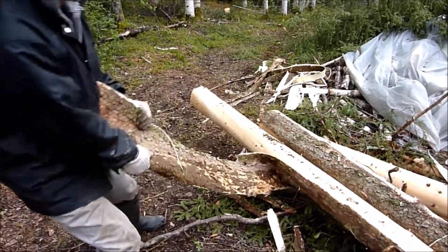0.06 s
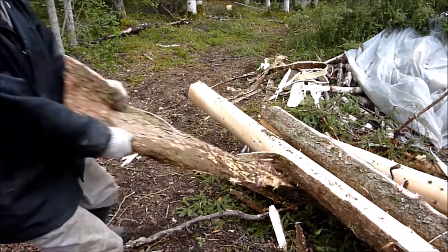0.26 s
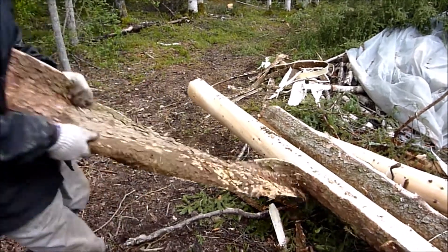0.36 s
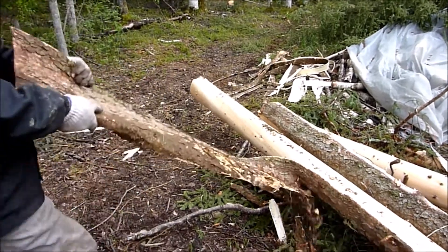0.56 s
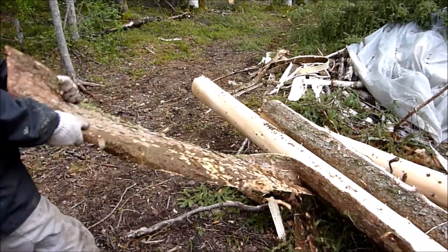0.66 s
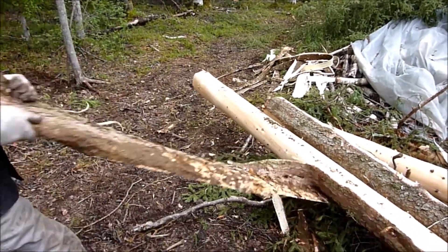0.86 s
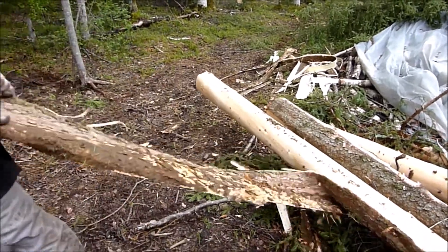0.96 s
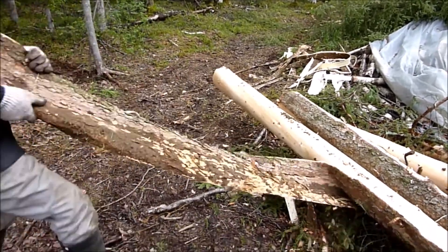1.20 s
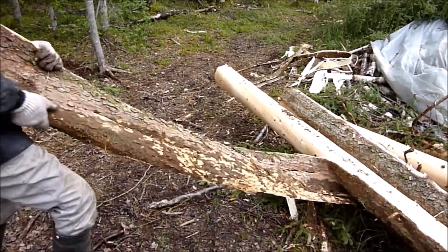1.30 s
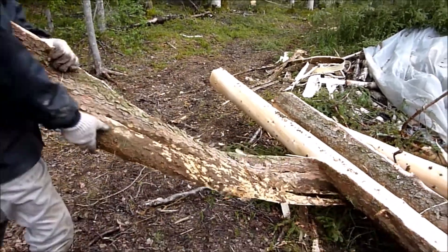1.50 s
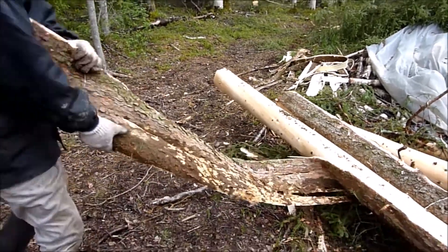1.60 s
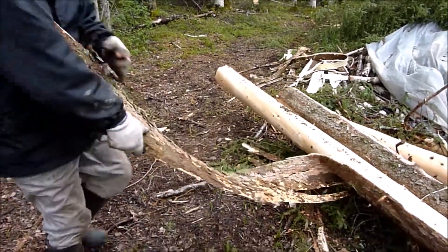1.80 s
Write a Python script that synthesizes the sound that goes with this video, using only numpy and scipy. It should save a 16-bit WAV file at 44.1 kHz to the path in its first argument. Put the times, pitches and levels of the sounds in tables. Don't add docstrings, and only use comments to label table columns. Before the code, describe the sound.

Bark tears off a log in two short tugs, each a dense dry crackle with sharp fibre snaps and hollow knocks, then light rustling and twig ticks; close stereo microphone in quiet woods.

```python
import sys
import numpy as np
from scipy import signal
from scipy.io import wavfile

SR = 44100
rng = np.random.default_rng(int(sys.argv[2]) if len(sys.argv) > 2 else 0)


def amplitude_ratio(level_db):
    exponent = np.asarray(level_db, float) / 20
    return 10 ** exponent


def output_pcm(signal):
    pcm = np.clip(np.atleast_2d(signal).T, -1, 1) * 32767
    wavfile.write(sys.argv[1], SR, np.round(pcm).astype(np.int16))


N = 81585


def rms_one(x):
    return x / np.sqrt(np.mean(x ** 2) + 1e-20)


def in_time(rows, outside=-120):
    s, *columns = np.transpose(rows)
    return [np.interp(np.arange(N) / SR, s, c, outside, outside) for c in columns]


def at_hz(points, hz):
    table_hz, level_db = np.transpose(points)
    return np.interp(np.log(hz), np.log(table_hz), level_db)


def drift(rate_hz):
    r = np.exp(-2 * np.pi * rate_hz / SR)
    wander = signal.lfilter([1], [1, -2 * r, r * r], rng.standard_normal(N + SR))
    return rms_one(wander[SR:])


def band_noise(order, edges_hz, noise):
    return signal.sosfilt(signal.butter(order, edges_hz, "band", fs=SR, output="sos"), noise)


def ring(push, hz, t60):
    r, w = amplitude_ratio(-60 / (t60 * SR)), 2 * np.pi * hz / SR
    return signal.lfilter([0, np.sin(w)], [1, -2 * r * np.cos(w), r * r], push + 1e-18)


def clicks(per_s, spread_db):
    size = amplitude_ratio(spread_db * np.minimum(rng.exponential(1, N), 5)) * rng.choice([-1, 1], N)
    return size * (rng.random(N) < per_s / SR)


def grains(per_s, spread_db, pitches_hz, gains_db, cycles):
    train = clicks(per_s, spread_db)
    dealt = rng.integers(0, len(pitches_hz), N)
    total = 0
    for k, (hz, gain_db) in enumerate(zip(pitches_hz, gains_db)):
        total = total + amplitude_ratio(gain_db) * rms_one(ring(train * (dealt == k), hz, cycles / hz))
    return rms_one(total)


FIBRES_PER_S, FIBRE_SPREAD_DB, FIBRE_CYCLES, CLUMP_DB = 16000, 2.6, 14.0, 1.1


def crackle(spectrum, clumps_per_s):
    hz = np.geomspace(1200, 15000, num=24)
    gains_db = at_hz(spectrum, hz) + 10 * np.log10(hz)
    clumps = amplitude_ratio(CLUMP_DB * drift(clumps_per_s))
    return clumps * grains(FIBRES_PER_S, FIBRE_SPREAD_DB, hz, gains_db, FIBRE_CYCLES)


SNAP_S, SNAP_RISE_S, SNAP_WIDTH_OCTAVES, SNAP_BROAD_DB, SNAP_LEAD = .0011, .0002, .75, -17, 3.5


def snaps(rows):
    out, t = np.zeros(N + SR), np.arange(600) / SR
    for (s, db, hz), noise in zip(rows, rng.standard_normal((len(rows), len(t)))):
        burst = (noise - SNAP_LEAD * (t == 0)) * np.exp(-t / SNAP_S)
        edges = hz * 2 ** np.array([-SNAP_WIDTH_OCTAVES, SNAP_WIDTH_OCTAVES])
        peak = band_noise(2, np.clip(edges, 100, .45 * SR), burst)
        broad = np.diff(burst, prepend=0) / np.abs(burst).max()
        snap = peak / np.abs(peak).max() + amplitude_ratio(SNAP_BROAD_DB) * broad
        start = int((s - SNAP_RISE_S) * SR)
        out[start:start + len(t)] += amplitude_ratio(db) * snap
    return out[:N]


LEAN_HZ, WIDE_DB, WIDE_HZ, SCATTER_S, PATHS_PER_S = 1200, -1.5, 8000, .0015, 60


def stereo(x, left_db):
    t = np.arange(600) / SR
    scatter = rng.standard_normal((8, len(t))) * np.exp(-t / SCATTER_S)
    scatter = scatter / np.linalg.norm(scatter, axis=1, keepdims=True)
    treble = signal.lfilter(*signal.butter(1, WIDE_HZ, "high", fs=SR), x)
    away = (np.arange(N) / SR * PATHS_PER_S - np.arange(8)[:, None]) % 8 - 1
    share = np.cos(np.pi / 2 * np.clip(away, -1, 1))
    side = amplitude_ratio(WIDE_DB) * signal.fftconvolve(treble * share, scatter, axes=1)[:, :N].sum(0)
    lean = signal.lfilter(*signal.butter(1, LEAN_HZ, "high", fs=SR), x)
    left = x + side + (amplitude_ratio(left_db) - 1) * lean
    right = x - side + (amplitude_ratio(-left_db) - 1) * lean
    return np.array([left, right])


# pitch_hz, level_db (per Hz)
FOREST = [(15, -14), (28, 9.5), (45, -1.5), (754, -0.5), (2220, -12), (6740, -15.5), (7920, -22.5),
          (12500, -17.5), (14800, -24), (16000, -36)]
# pitch_hz, likeness (0 to 1)
LIKENESS = [(60, 0.92), (240, 0.81), (950, 0.83), (3770, 0.033), (15000, 0.011)]
FOREST_DB = -55


def forest():
    out, together, edges = 0, drift(2.5), 20 * 2 ** np.arange(0, 10, .5)
    white = rng.standard_normal((2, 2, N))
    for k, (low, high) in enumerate(zip(edges, edges[1:])):
        mid, side = band_noise(2, [low, high], white[k % 2])
        hz = np.sqrt(low * high)
        alike = np.clip(at_hz(LIKENESS, hz), -1, 1)
        gain = amplitude_ratio(at_hz(FOREST, hz) + .6 * together + 1.2 * drift(12))
        out = out + gain * (np.sqrt(1 + alike) * mid + np.sqrt(1 - alike) * side * [[1], [-1]])
    return amplitude_ratio(FOREST_DB) * rms_one(out)


# start_s, rustle level_db, weight level_db
MOVE = [(0, -96, 2), (.1, -66, -6), (.135, -52.5, 12.5), (.165, -60, 3), (.55, -64, -4.5), (1.1, -62, 2),
        (1.18, -61, 0), (1.23, -63, 2.5), (1.29, -55.5, -0.5), (1.35, -62, 1.5), (1.42, -55.5, 4.5),
        (1.5, -62, 3.5), (1.56, -66, 0.5), (1.61, -63.5, 3), (1.85, -66.5, 1)]
# pitch_hz, level_db (per Hz)
RUSTLE = [(530, -31), (900, -1), (956, -55), (1310, -2), (1790, -4), (10600, -8), (16000, -13)]
# start_s, peak level_db, pitch_hz
TICKS = [(.0342, -60, 3900), (.0881, -49, 4500), (.5708, -43.5, 2600), (.6479, -43.5, 5000),
         (.6653, -53, 4300), (.6798, -48, 3800), (.689, -45, 7500), (.6929, -37.5, 5000),
         (.7028, -49, 9400), (.7157, -44, 5800), (.7294, -46, 11000), (.7381, -35.5, 2000),
         (1.1737, -43, 4600), (1.1912, -39, 12000), (1.2199, -45, 7000), (1.2379, -52, 2600),
         (1.2449, -53, 9900), (1.2654, -49, 2300), (1.2802, -38, 2280), (1.2886, -39, 6500),
         (1.3345, -53, 12000), (1.39, -48, 9800), (1.397, -44, 10000), (1.449, -42, 1600),
         (1.458, -48, 2500), (1.4665, -50, 7500), (1.4785, -63, 2260), (1.5243, -44, 2000),
         (1.6052, -38, 4840), (1.6051, -57, 10300), (1.7623, -43, 1920), (1.7622, -48, 4600),
         (1.8283, -50, 14100)]
CRUNCH_DB, CRUNCH_PER_S, CRUNCH_LOW_HZ, CRUNCH_HIGH_HZ = -61, 1200, 309, 1620


def movement():
    move_db, weight_db = in_time(MOVE)
    hz = np.geomspace(CRUNCH_LOW_HZ, CRUNCH_HIGH_HZ, num=12)
    hump_db = -2.5 * np.log2(hz / 700) ** 2
    crunch = amplitude_ratio(CRUNCH_DB + weight_db) * grains(CRUNCH_PER_S, 1.8, hz, hump_db, 9.0)
    rustle = amplitude_ratio(move_db) * crackle(RUSTLE, 60)
    return rustle + snaps(TICKS) + crunch


# start_s, tearing level_db, drone of the wood over it level_db
TUG_1 = [
    (.215, -68, 8),
    (.2405, -55, 7),
    (.246, -44.5, 4.5),
    (.29, -37.5, 6.5),
    (.35, -35, 2),
    (.39, -38, -0.3),
    (.413, -39.5, 9),
    (.44, -50.5, 0),
    (.49, -70, 10),
]
TUG_2 = [
    (.68, -62.5, 0.92),
    (.745, -54, 1),
    (.775, -44, 3.1),
    (.85, -40.5, 0.43),
    (.9, -39, 1.3),
    (.93, -38.5, 3.8),
    (.985, -42, 3.7),
    (1.012, -53, 1.4),
    (1.035, -70, 8.9),
]


def tug_force():
    (first, first_low), (second, second_low) = in_time(TUG_1), in_time(TUG_2)
    tear_db = np.maximum(first, second)
    return tear_db, tear_db + np.maximum(first_low, second_low)


SHUDDER_DB, SHUDDER_HZ = -16, 121


def shudder(drone_db):
    low = band_noise(3, [SHUDDER_HZ / 2.35, SHUDDER_HZ * 2.9], rng.standard_normal(N))
    return amplitude_ratio(drone_db + SHUDDER_DB) * rms_one(low)


# start_s, peak level_db,
# contact pitch_hz
KNOCKS = [(.0875, -39, 656), (.129, -44, 704), (.153, -36, 756), (.2255, -50, 654), (0.2426, -6, 890),
          (.2438, -13, 1730), (.2475, -23, 1100), (0.2452, -25.5, 176), (.2505, -20.5, 910),
          (.258, -20.5, 365), (.261, -22, 645), (.306, -17.5, 1120), (.336, -22, 594), (.35, -36.5, 503),
          (.372, -45, 570), (.401, -22.5, 1010), (.4065, -18, 570), (.666, -39, 700), (.722, -38, 1410),
          (0.7765, -22, 572), (.81, -31, 586), (.848, -35, 560), (.904, -27.5, 650), (.9425, -9.5, 1175),
          (0.9434, -15.5, 618), (.9475, -33, 730), (.96, -23, 766), (.943, -25, 223), (.99, -28, 596),
          (1.36, -42.5, 730), (1.414, -54, 263), (1.462, -43, 890), (1.478, -39.5, 770), (1.52, -40.5, 775),
          (1.586, -39.5, 674), (1.6055, -37.5, 1030), (1.6225, -45, 790), (1.666, -43, 850),
          (1.726, -46, 593), (1.7615, -45, 560)]
# pitch_hz, knocked level_db, t60_s, rubbed level_db
WOOD = [(212, -14, 0.12, -8), (257, -12, 0.09, -7), (350, -3.5, 0.05, -9), (500, -5, 0.04, -5),
        (600, 3, 0.04, 1.1), (690, 0.4, 0.025, -1.1), (900, -2.5, 0.0083, -5), (1095, -1.1, 0.03, -2.1),
        (1355, 1.1, 0.011, -1.1), (1925, 3.5, 0.011, 3)]
KNOCK_TRIM_DB, KNOCK_CYCLES, KNOCK_HARD_HZ = -22, 6.0, 2500
DRONE_PER_S, DRONE_SPREAD_DB, WOOD_LOW_HZ = 1200, 4.5, 150


def wood(drone_db):
    push, thud, t = np.zeros((len(WOOD), N + SR)), np.zeros(N + SR), np.arange(1500) / SR
    pulse = t * np.exp(-2 * np.pi * KNOCK_HARD_HZ * t)
    pulse = pulse / pulse.sum()
    for (s, db, hz), luck_db in zip(KNOCKS, rng.normal(0, 1.4, (len(KNOCKS), len(WOOD)))):
        at = slice(int(s * SR), int(s * SR) + len(t))
        push[:, at] += amplitude_ratio(db + KNOCK_TRIM_DB + luck_db)[:, None] * pulse
        swell = (1 - np.exp(-1.5 * t * hz)) ** 2
        decay = amplitude_ratio(-60 * t * hz / KNOCK_CYCLES)
        thud[at] -= 3.55 * amplitude_ratio(db) * np.sin(2 * np.pi * hz * t) * decay * swell
    knocks, steady, drone = thud[:N], 0, 0
    for k, (hz, knock_db, t60, rub_db) in enumerate(WOOD):
        knocks = knocks + (-1) ** k * amplitude_ratio(knock_db) * ring(push[k, :N], hz, t60)
        rub = rms_one(clicks(DRONE_PER_S, DRONE_SPREAD_DB))
        steady = steady + amplitude_ratio(rub_db) * ring(rub, hz, t60)
        drone = drone + amplitude_ratio(rub_db) * ring(amplitude_ratio(drone_db) * rub, hz, t60)
    drone = drone / np.std(steady)
    return signal.sosfilt(signal.butter(3, WOOD_LOW_HZ, "high", fs=SR, output="sos"), knocks + drone)


# pitch_hz, width_hz, level_db
SCALES = [(1770, 93, -7), (2493, 30, -4.5), (3000, 150, -7), (3680, 210, -12.5), (4200, 63, -9),
          (4840, 80, -4), (5340, 79, -13)]


def scales(x):
    out = x
    for hz, width_hz, db in SCALES:
        out = out + 2 * amplitude_ratio(db) * signal.lfilter(*signal.iirpeak(hz, hz / width_hz, SR), x)
    return out


# pitch_hz, level_db (per Hz)
TEAR = [(530, -35), (900, -5), (1070, 12), (1410, -40), (2960, 3), (5480, 5), (7860, -5.5), (13000, -0.5),
        (16000, -12)]
# start_s, peak level_db, pitch_hz
SNAPS = [(.1238, -35.5, 10000), (.1284, -30, 2650), (.1283, -19.5, 10700), (.141, -44, 9000),
         (.1537, -25.5, 3100), (.1534, -26.5, 8800), (.1562, -34, 7200), (.2271, -41, 4700),
         (.2333, -30, 13000), (.2336, -33, 2600), (.2445, -19, 3970), (.245, -35, 8500),
         (.249, -20.5, 2490), (.2563, -42, 11500), (.2637, -41, 10700), (.2755, -35, 3200),
         (.2798, -23, 3420), (.2859, -42, 13000), (.2866, -37, 5000), (.2897, -17.5, 2900),
         (.3064, -19.5, 3800), (.3226, -18.5, 5360), (.3368, -15, 3070), (.3367, -18, 8450),
         (.3497, -17.5, 4420), (.3522, -16.5, 3000), (.3518, -29, 7500), (.371, -25, 5500),
         (.3739, -24, 6000), (.3857, -31, 4200), (.3877, -36, 9000), (.4068, -22, 2060), (.4091, -26, 6000),
         (.4203, -35, 4800), (.4462, -48, 4100), (.7509, -29.5, 3100), (.7591, -35, 4130),
         (.7636, -32, 9000), (.777, -33, 3180), (.7914, -51, 3800), (.8241, -30, 9800), (.8426, -15, 11660),
         (.8524, -22, 4100), (.8589, -31, 3160), (.8777, -27, 8700), (.8826, -23, 12000),
         (.8907, -38, 10000), (.9038, -36, 8500), (.9197, -33, 9000), (.9211, -22, 5500),
         (.9318, -17.5, 4050), (.9344, -22, 7900), (.9431, -17, 4370), (.9632, -22, 4400),
         (.9738, -21, 8700), (.9882, -26.5, 2440), (1.007, -36, 9700), (1.014, -37, 5700)]


def tearing(tear_db):
    return scales(amplitude_ratio(tear_db) * crackle(TEAR, 70) + snaps(SNAPS))


def scene():
    tear_db, drone_db = tug_force()
    bark = shudder(drone_db) + wood(drone_db) + tearing(tear_db)
    return forest() + stereo(movement(), 1.0) + stereo(bark, -1.1)


def roll_off(x):
    return signal.sosfilt(signal.butter(12, 16640, fs=SR, output="sos"), x)


NOTCH_HZ, NOTCH_WIDTH_HZ, CUTOFF_HZ = 7950, 300, 15850


def record(dry):
    x = signal.lfilter(*signal.iirnotch(NOTCH_HZ, NOTCH_HZ / NOTCH_WIDTH_HZ, SR), dry)
    x = signal.sosfilt(signal.cheby2(14, 42, CUTOFF_HZ, fs=SR, output="sos"), x)
    x = signal.sosfilt(signal.cheby2(12, 60, 16700, fs=SR, output="sos"), x)
    return roll_off(x)


dry = scene()
out = record(dry)
output_pcm(out)
```